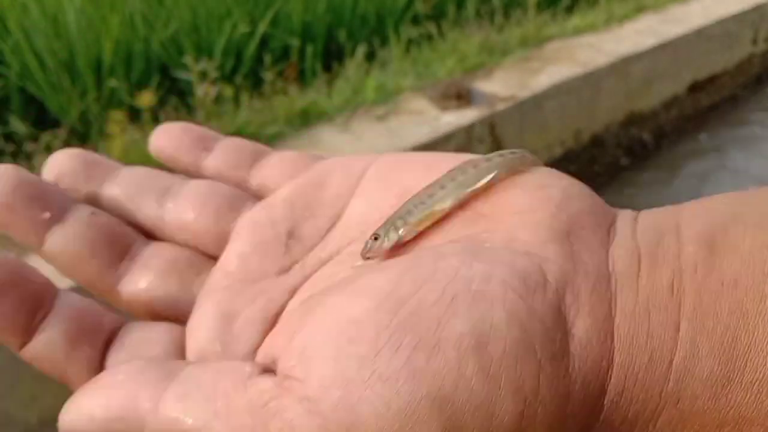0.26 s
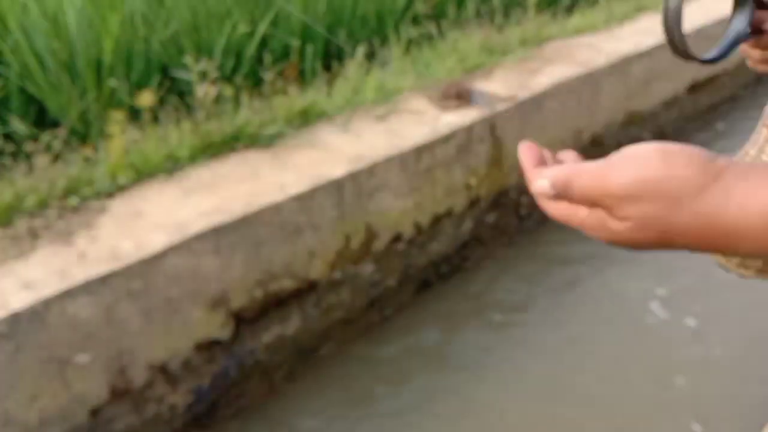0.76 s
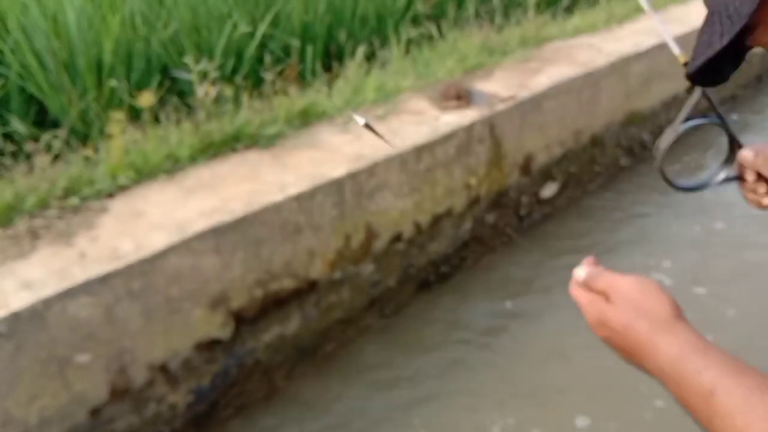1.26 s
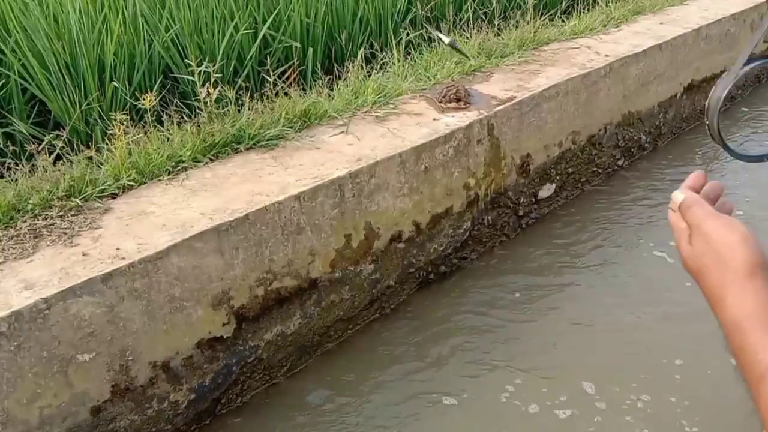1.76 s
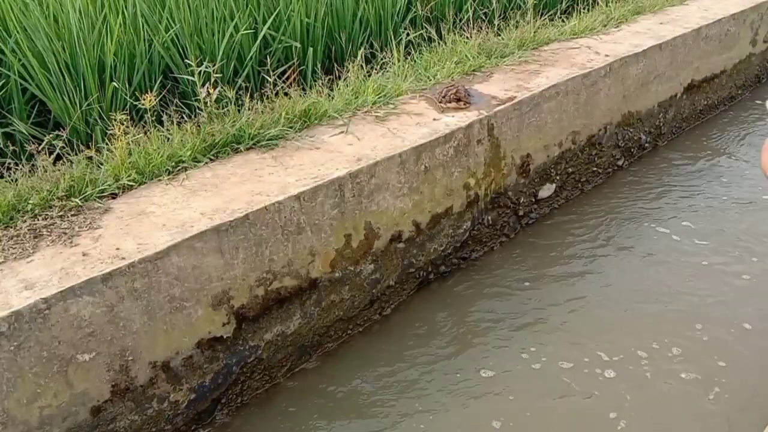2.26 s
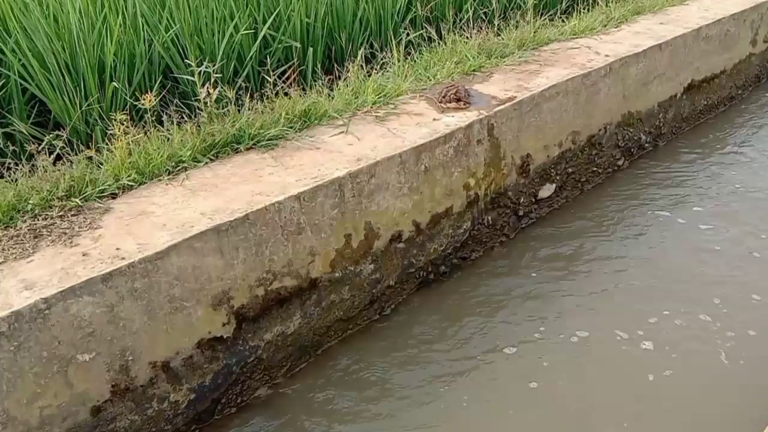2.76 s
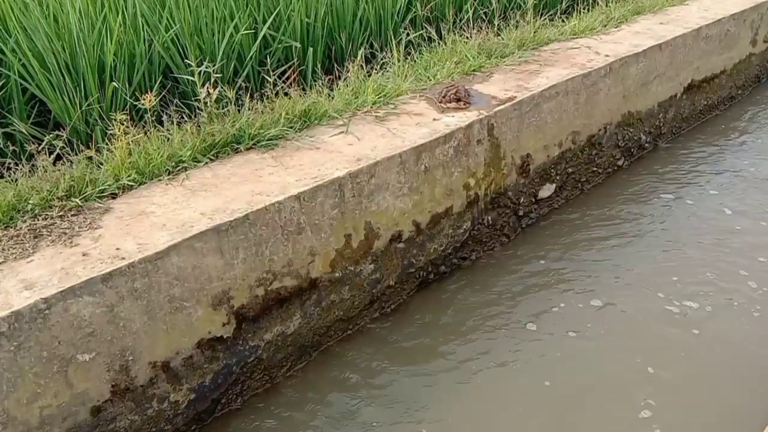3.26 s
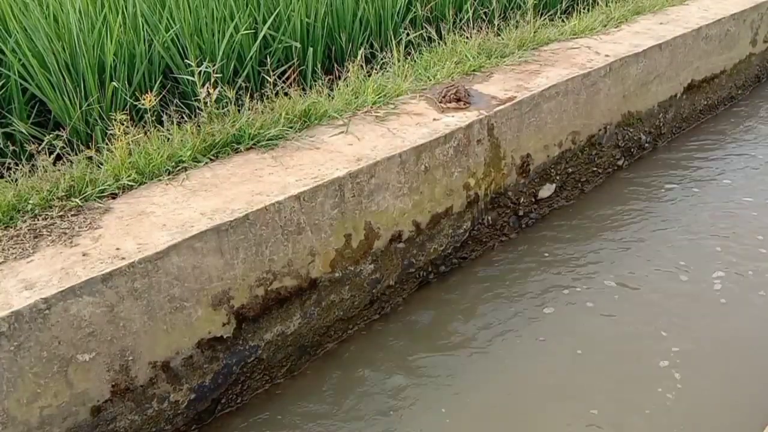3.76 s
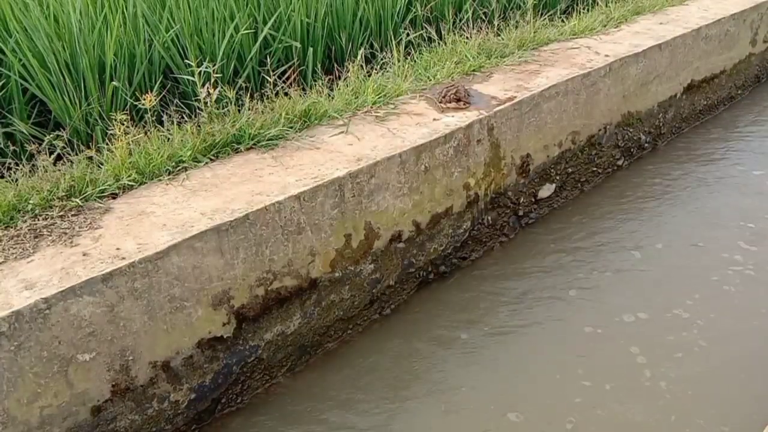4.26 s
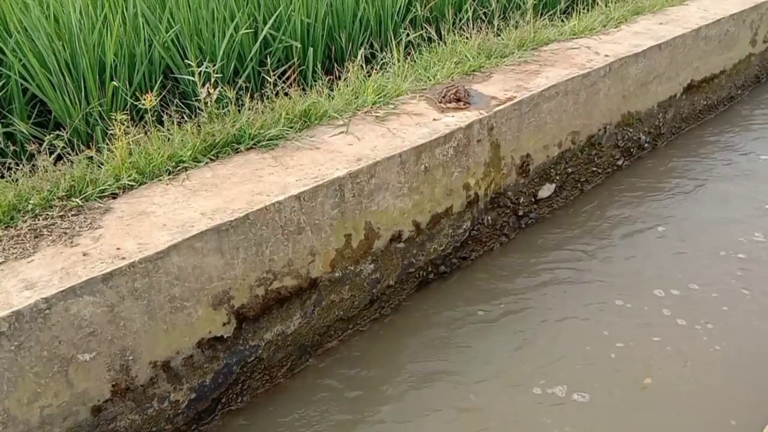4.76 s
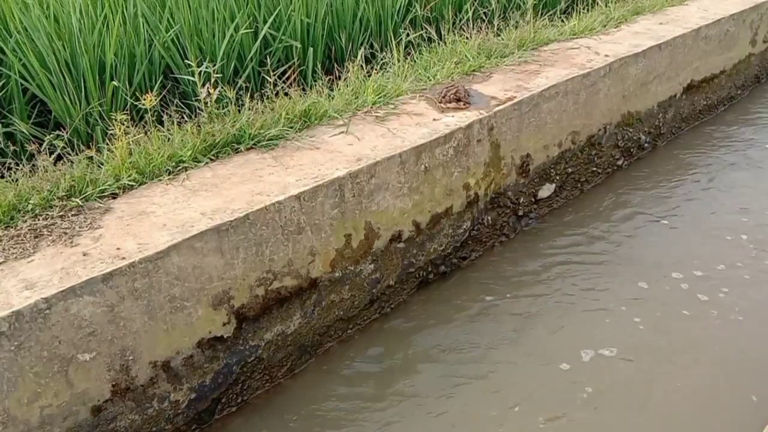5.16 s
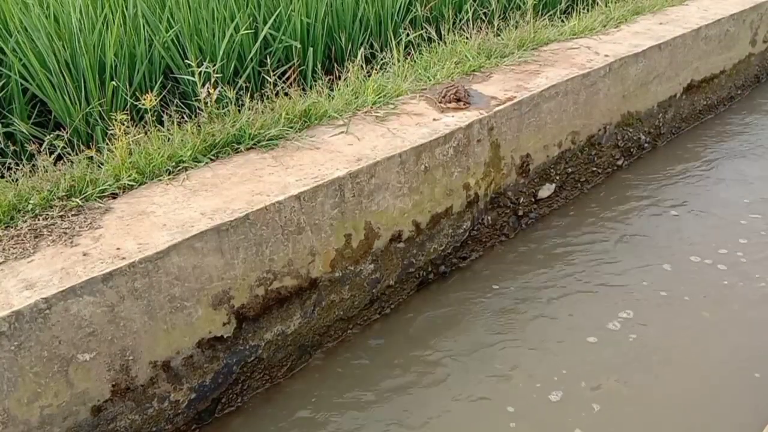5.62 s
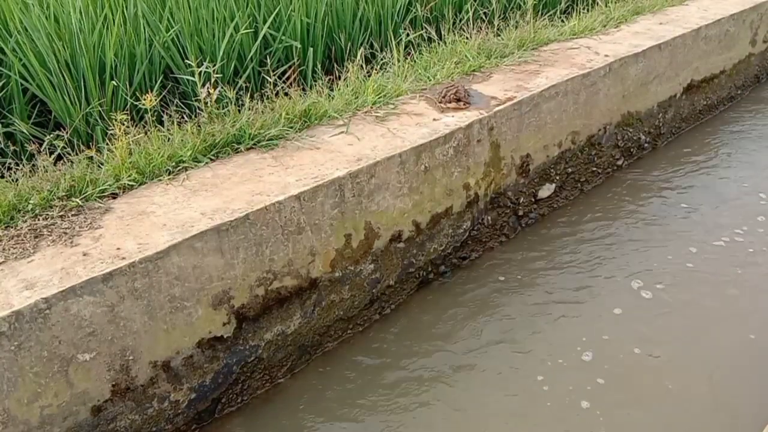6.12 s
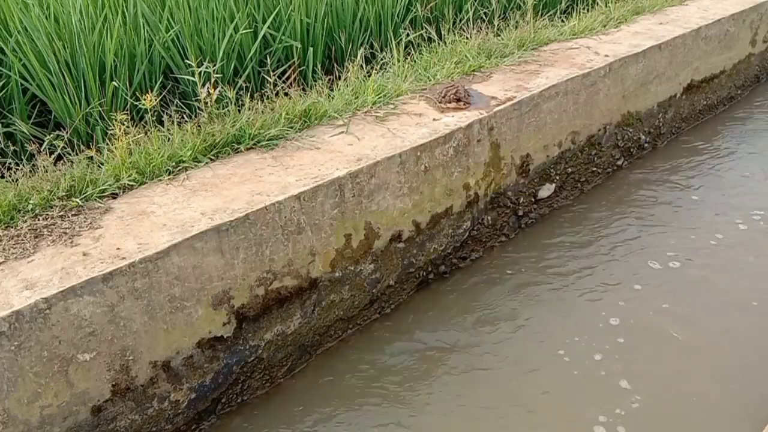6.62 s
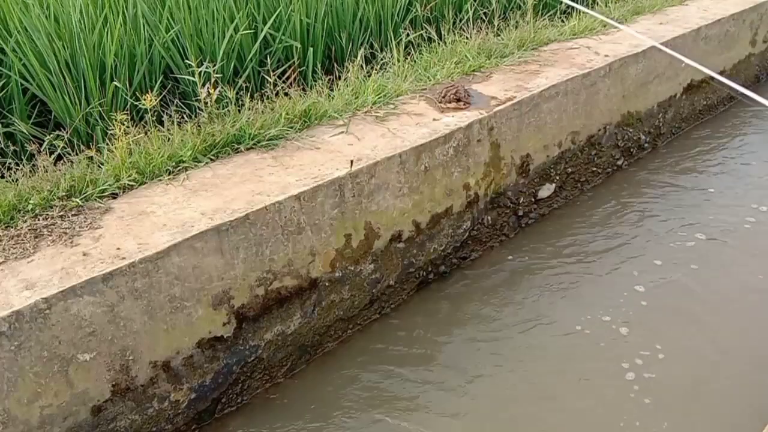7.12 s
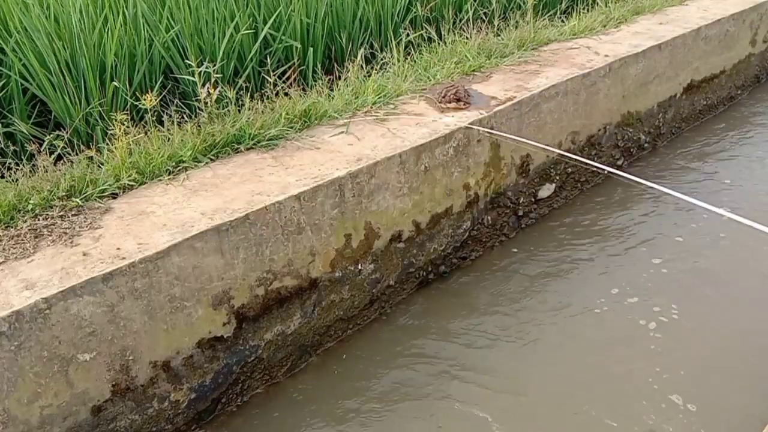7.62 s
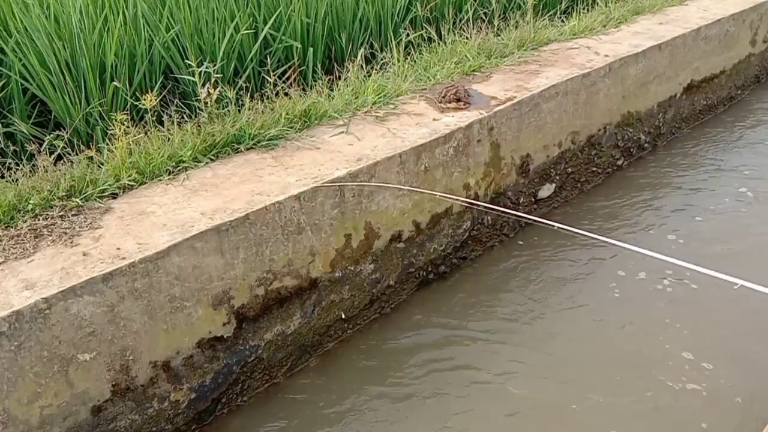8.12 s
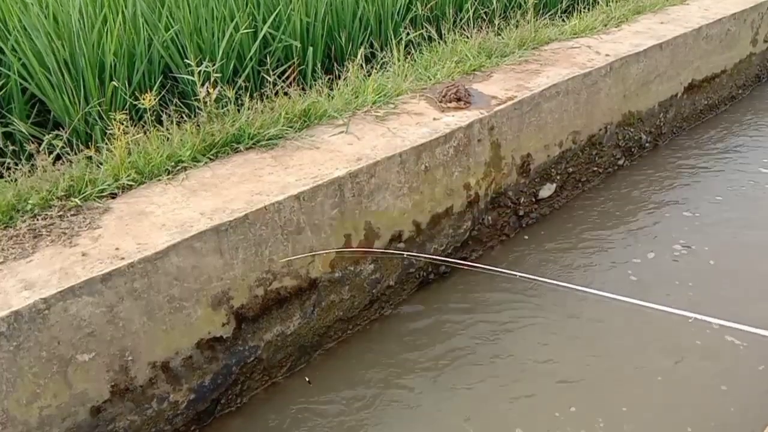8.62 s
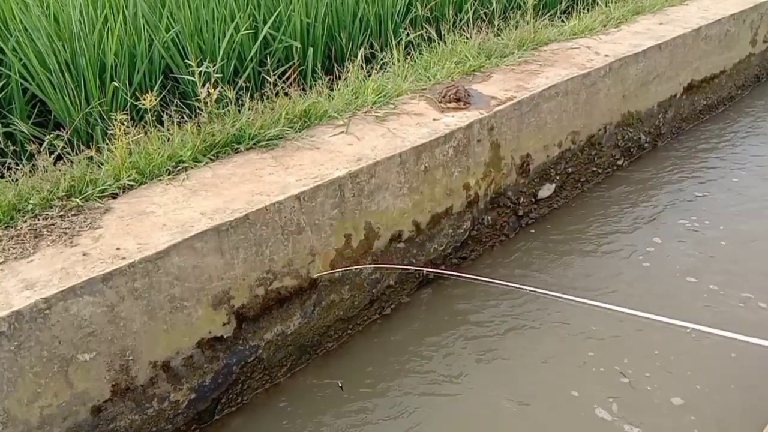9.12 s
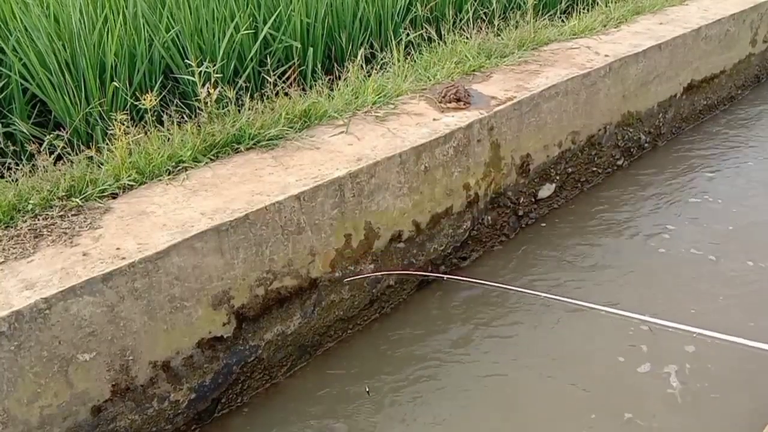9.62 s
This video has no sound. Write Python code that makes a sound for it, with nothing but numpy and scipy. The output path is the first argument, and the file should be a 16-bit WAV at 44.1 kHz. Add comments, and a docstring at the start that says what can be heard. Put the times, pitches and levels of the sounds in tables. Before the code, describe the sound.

From 0 to 4 seconds, water trickles quietly along a small concrete ditch in the open: a patchy wash of hiss, low gurgles and small rounded plops, thinning near 2 seconds and picking up again just before 3. A small bird gives very short, high, thin chips several times a second at most, continuing to the end. Lumpy light wind brushes the microphone, with dull bumps near 1.4 and 3 seconds; a distant pump drones almost inaudibly and fades. From about 4 seconds a slow engine emerges, rising fast by 5 to 6 into a low, nearly pure, wavering hum around 125 to 140 hertz, creeping upward in pitch over slight roar, and remaining the loudest sound. From 5.6 seconds the water is busier, with bright plops and slapping drops near 5.9, 7.3, 8.1 and 8.75, still splashing at about 9.9.

```python
"""Water trickles along a small concrete ditch: a patchy wash of bubbles, plops and snaps; a small bird chips nearby.
Bubbles are decaying sines of rising pitch, over bands of hiss and random bursts of spray; chips are quick sweeps.
A pump motor drones faintly far off, as four steady lines; then a slow engine draws near, and its low orders,
sines at multiples of the firing rate over a rough roar, become the loudest sound.
A light wind and a few bumps reach the microphone as shaped low noise and short low rings."""
import sys
import numpy as np
from scipy import signal
from scipy.fft import rfft, irfft
from scipy.io import wavfile
from scipy.ndimage import uniform_filter1d

SR = 44100
rng = np.random.default_rng(int(sys.argv[2]) if len(sys.argv) > 2 else 0)


def inscribe(sig):
    """Save sig as 16-bit PCM at rate SR to the path in sys.argv[1].

    A 1-D sig is mono; a 2-D sig holds one channel per row.
    Samples are clipped to [-1, 1] before scaling.
    """
    pcm = np.round(np.clip(np.atleast_2d(sig).T, -1, 1) * 32767)
    wavfile.write(sys.argv[1], SR, pcm.astype(np.int16))


N = 435708


def from_db(db):
    """Amplitude ratio of a level: 20 dB for each factor of ten."""
    return 10 ** (np.asarray(db) / 20)


def rms_one(x):
    """Normalise the mean power, so that the rms is 1."""
    return x / np.sqrt(np.mean(x ** 2) + 1e-20)


def in_time(rows):
    """Linear interpolation of a table's columns over time, one value per sample."""
    times, *columns = np.transpose(rows)
    return [np.interp(np.arange(N) / SR, times, column) for column in columns]


def at_hz(points, hz):
    """Linear interpolation of a spectrum's level along log frequency."""
    point_hz, point_db = np.transpose(points)
    return np.interp(np.log(hz), np.log(point_hz), point_db)


def drift(rate_hz):
    """Slow random variation of rms 1: white noise through two equal one-pole low-passes at rate_hz."""
    step = 40   # samples between coarse values
    pole = np.exp(-2 * np.pi * rate_hz * step / SR)
    white = rng.standard_normal(N // step + 2002)
    slow = signal.lfilter([1], [1, -2 * pole, pole * pole], white)[2000:]   # skip the filter's onset
    return np.interp(np.arange(N) / step, np.arange(len(slow)), rms_one(slow))


def coloured(spectrum):
    """Stationary noise of rms 1: white noise weighted by a spectrum, silent below half its first frequency."""
    hz = np.maximum(np.arange(N // 2 + 1) * SR / N, 1)
    gain = from_db(at_hz(spectrum, hz)) * (hz > spectrum[0][0] / 2)
    return rms_one(irfft(rfft(rng.standard_normal(N)) * gain, N))


def add(out, start_s, sound):
    """Superposition of a short sound at a given time."""
    i = round(start_s * SR)
    out[i:i + len(sound)] += sound[:N - i]


def swells(events, width_s):
    """Gaussian rises and dips in level [dB], summed; width_s is their standard deviation."""
    t = np.arange(0, N + 64, 64) / SR
    total_db = sum(db * np.exp(-.5 * ((t - s) / width_s) ** 2) for s, db in events)
    return np.interp(np.arange(N) / SR, t, total_db)


def wash(grain_db, patchy_db, crackle_db):
    """Random superposition: bands of hiss swell in separate patches; bubbles burst and spray crackles in them."""
    # spectrum of the water, shaping each size group from within: (frequency [Hz], relative density [dB per Hz])
    water_spectrum = [(150, -41), (250, -18.5), (336, -9), (444, -6.5), (566, -12.5), (709, -4), (829, -7),
                      (1240, -5), (1500, -7.5), (4400, -18), (5140, -27.5), (5600, -22.5), (6150, -28),
                      (6800, -21), (7660, -25), (9610, -29), (14600, -35.5), (15900, -24.5)]
    streak_share = 0.46   # below 5500 Hz the hiss fills this share of each band
    edges = np.r_[250 * 2 ** np.arange(0, 2.6, 1 / 8), np.arange(1600, 5500, 170),
                  np.arange(5500, 9000, 500), np.geomspace(9000, 16000, 5)]   # Hz
    # gurgle, lower wash, wash, splashing, fine and finest spray
    groups = np.digitize(edges, [750, 1150, 2500, 5500, 10000])
    parts = np.zeros((6, N))
    white = rng.standard_normal((3, N))
    drops = [crackle(per_s=55.0, fade_s=0.0079) for part in parts]   # each group has its own droplets
    clumps = rng.random(200)   # shared by bubbles of all sizes
    for k, (low, high, group) in enumerate(zip(edges, edges[1:], groups)):
        hz = np.sqrt(low * high)
        half = (high - low) / 2 * (streak_share if hz < 5500 else 1)
        band = signal.butter(2, [hz - half, hz + half], "band", fs=SR, output="sos")
        hiss = rms_one(signal.sosfilt(band, white[k % 3]))
        fine = np.clip(np.log2(hz / 3800) / 3.0, 0, 1)   # share of spray against bubbles
        patch_db = (2.0 - fine) * patchy_db * (drift(5.3) + 0.75 * drift(1.72))
        bubbles = burble(low, high, hiss, clumps, cycles=71.5, tail_s=0.011, tail_db=-3.5)
        grains = (1 - fine) * from_db(grain_db) * bubbles
        spray = fine * from_db(crackle_db) * drops[group] * hiss
        band_gain = from_db(at_hz(water_spectrum, hz)) * np.sqrt(high - low)
        parts[group] += band_gain * (from_db(patch_db) * hiss + grains + spray)
    levels_db = size_levels(surge_db=0.47)
    return sum(from_db(db) * rms_one(part) for db, part in zip(levels_db, parts))


def size_levels(surge_db):
    """Additive level modulation [dB] of each size of bubble and drop: flow, surges, gurgles and splashes."""
    # the flow: (time [s], wash before offset [dB], finest spray before offset [dB], low gurgle before swells [dB])
    flow = [(0.0, -38.5, -73.5, -59), (0.27, -40, -74, -51.5), (0.49, -47, -70.5, -57.5),
            (0.79, -40, -72, -60), (1.35, -42.5, -79.5, -61), (1.51, -43, -76.5, -62),
            (1.7, -47, -80.5, -66.5), (2.26, -55, -80, -70.5), (2.72, -38.5, -71.5, -55),
            (3.0, -43.5, -69, -60.5), (3.58, -46, -80.5, -63), (4.62, -43.5, -85, -58.5),
            (4.95, -43.5, -78.5, -51), (5.45, -41, -82, -61), (5.94, -32.5, -75.5, -54.5),
            (7.04, -37.5, -80, -59), (7.9, -35.5, -71, -52), (8.42, -40.5, -74, -55.5),
            (8.81, -28.5, -74.5, -56.5), (9.05, -35.5, -75, -40), (9.27, -37, -75.5, -52.5),
            (9.88, -37.5, -76.5, -53.5)]
    # lower wash, 750-1150 Hz: (time [s], level before offset and swells [dB])
    low_wash = [(0.0, -52), (0.19, -49), (0.52, -55), (0.82, -54), (1.35, -50.5), (1.51, -62), (2.31, -63),
                (2.56, -51), (2.83, -47.5), (3.63, -63), (3.88, -61.5), (4.1, -50), (4.73, -54.5),
                (4.98, -49), (5.47, -50), (5.72, -48.5), (5.86, -43), (6.24, -43.5), (6.35, -41.5),
                (6.85, -46), (7.1, -47.5), (7.51, -41), (8.53, -49), (8.89, -43.5), (9.38, -49.5),
                (9.88, -48.5)]
    # splashing, 2500-5500 Hz: (time [s], level before offset and swells [dB])
    splashing = [(0.0, -54), (0.36, -52), (1.38, -55), (1.9, -65), (2.28, -65), (2.75, -53), (3.19, -52.5),
                 (3.58, -61.5), (4.79, -55), (4.92, -54), (5.61, -55.5), (5.86, -49), (6.41, -48),
                 (6.74, -52.5), (6.99, -51), (7.1, -51), (7.73, -47.5), (8.15, -53.5), (8.78, -43),
                 (8.92, -44), (9.27, -49), (9.88, -52)]
    # wash, fine and finest spray: (offset [dB], share of the wash's level; the rest follows the spray's)
    sizes = [(-0.5, 0.91), (4.5, 0.43), (8.5, 0.0083)]
    # low gurgles well up and sink again: (time [s], swell [dB])
    gurgles = [(.41, 8), (1.43, 10), (3.63, 9), (4.13, 10), (4.81, 6.5), (5.72, 16), (6.85, 6.5),
               (7.38, 18.5), (7.81, 7.5), (8.5, 6), (9.0, 2.5), (9.52, 13)]
    # splashes throw up spray for a moment: (time [s], swell before shares [dB])
    splashes = [(2.94, 5), (3.36, 6), (3.99, 11.5), (5.87, 11.5), (6.44, 6), (6.96, 8), (7.32, 7), (8.1, 2),
                (9.05, 7), (9.69, 11), (9.87, 11)]
    # share of that swell, one each for wash, splashing, fine and finest spray: (share)
    splash_shares = [0.37, 0.9, 0.79, 1.0]
    # the flow surges or slackens for about a tenth of a second: (time [s], swell before shares [dB])
    surges = [(.87, 7.5), (1.14, 1), (1.3, 7.5), (1.45, 6), (1.54, 2.5), (2.78, 5.5), (2.95, 1),
              (3.36, 3.5), (3.65, 7.5), (3.92, 8.5), (1.62, -4.5), (4.07, -6), (5.12, 5), (5.72, 10),
              (5.84, 7), (6.03, -2.5), (8.68, 7), (8.83, 1), (8.95, 5), (9.19, 6.5), (9.53, 10)]
    # share of that swell, one each for lower wash, wash, splashing, fine and finest spray: (share)
    surge_shares = [0.91, 0.64, 0.65, .3, .1]

    wash_db, spray_db, gurgle_db = in_time(flow)
    splash_db = swells(splashes, width_s=0.014)
    flush_db = swells(surges, width_s=0.031)
    levels = [offset + share * wash_db + (1 - share) * spray_db for offset, share in sizes]
    levels.insert(1, in_time(splashing)[0] + 2.0)
    levels = [db + share * splash_db + surge_db * drift(1.4) for db, share in zip(levels, splash_shares)]
    levels.insert(0, in_time(low_wash)[0] + 2.7)
    levels = [db + share * flush_db for db, share in zip(levels, surge_shares)]
    return [gurgle_db + swells(gurgles, width_s=0.064)] + levels


def burble(low, high, hiss, clumps, cycles, tail_s, tail_db):
    """Clustered random arrivals: bubbles of one size, each trailing a streak of hiss that dies away; rms 1."""
    clump_s = .02
    draws = rng.random((180, 4))   # time, pitch, size and climb of each bubble
    # half of them join a clump
    draws[::2, 0] = (rng.choice(clumps, 90) + clump_s * SR / N * draws[::2, 0]) % 1
    pops, starts = np.zeros(N), np.zeros(N)
    for when, pitch, size, climb in draws:
        hz = low * (high / low) ** pitch
        gain = from_db(-3.0 * np.log(size + 0.037))   # a few are much louder
        add(pops, when * N / SR, gain * bubble(hz, cycles / hz, 0.06 * climb, 4.4 / hz))
        starts[int(when * N)] += gain
    fade = np.exp(-1 / (tail_s * SR))
    streaks = signal.lfilter([1 - fade], [1, -2 * fade, fade ** 2], starts) * hiss
    return rms_one(rms_one(pops) + from_db(tail_db) * rms_one(streaks))


def bubble(hz, t60, rise, attack_s):
    """Damped resonance of an air pocket whose pitch climbs as it nears the surface; envelope peak 1."""
    t = np.arange(round((t60 + attack_s) * SR)) / SR
    decay = from_db(-60 * (t / t60) ** 1.7)   # dies faster and faster as the bubble bursts
    shape = (1 - np.exp(-t / attack_s)) ** 2 * decay
    return shape / shape.max() * np.sin(2 * np.pi * hz * (t + rise * t * t / t60))


def crackle(per_s, fade_s):
    """Random impulse train for the spray's envelope: droplets land by chance, each a soft brief burst; rms 1."""
    drops = (rng.random(N) < per_s / SR) * rng.exponential(1, N) ** 1.84
    span = round(fade_s * SR)
    return rms_one(uniform_filter1d(uniform_filter1d(drops, span), span))


def plops():
    """Damped resonance of bubbles large enough to stand out singly; longer rings swell more slowly."""
    # single bubbles: (time near peak [s], peak before echoes [dB], starting pitch [Hz], ring [cycles to about -32 dB])
    single_bubbles = [(1.403, -37.5, 265, 8.5), (7.4, -37.5, 440, 22), (7.33, -39, 398, 11),
                      (0.439, -39, 485, 15), (1.015, -45, 505, 28), (0.86, -48, 580, 26),
                      (1.32, -42.5, 593, 27), (1.49, -44.5, 540, 20), (3.868, -37, 1270, 20),
                      (0.72, -39, 994, 40), (1.419, -34, 410, 7.3), (3.615, -38, 365, 21),
                      (3.972, -36.5, 368, 6.5), (4.012, -44, 293, 11), (8.949, -27, 292, 7.7),
                      (0.199, -38.5, 520, 11), (0.045, -36, 900, 23), (0.085, -42, 915, 35),
                      (0.29, -38, 374, 21), (0.345, -36.5, 808, 23), (0.395, -34, 430, 20),
                      (0.85, -40, 866, 16), (1.014, -37.5, 970, 19), (1.125, -35.5, 824, 28),
                      (1.438, -34, 973, 27), (2.632, -36.5, 1360, 37), (2.809, -42, 430, 12),
                      (2.94, -31, 975, 29), (2.965, -30.5, 1566, 20), (3.33, -37.5, 825, 12),
                      (3.385, -30, 1594, 27), (3.39, -29.5, 2120, 20), (3.94, -36, 697, 46),
                      (6.135, -36, 416, 6.4), (6.336, -40, 410, 11), (0.916, -37.5, 780, 14),
                      (2.485, -37.5, 647, 8.1), (2.622, -31.5, 658, 19), (5.425, -43.5, 513, 29),
                      (5.504, -33.5, 650, 10), (5.645, -18, 750, 18), (5.716, -28.5, 447, 18),
                      (6.017, -37, 635, 21), (6.256, -40, 627, 16), (6.391, -31.5, 706, 23),
                      (6.79, -30.5, 770, 12), (6.962, -35.5, 712, 21), (7.213, -37.5, 710, 20),
                      (7.325, -24.5, 806, 18), (7.373, -30, 699, 24), (7.634, -36, 704, 54),
                      (8.463, -38, 584, 15), (8.513, -25, 743, 7.8), (8.634, -30.5, 681, 13),
                      (8.765, -24.5, 726, 18), (9.17, -33, 776, 37), (2.008, -33.5, 1550, 25),
                      (2.287, -37, 1167, 23), (2.768, -24, 950, 17), (3.708, -33.5, 1470, 16),
                      (4.781, -25.5, 914, 12), (4.833, -32, 1060, 9.3), (5.204, -34.5, 1105, 16),
                      (5.512, -23.5, 1330, 26), (5.775, -23, 1880, 22), (5.92, -39, 1540, 14),
                      (6.024, -22.5, 930, 15), (6.217, -29, 1050, 16), (6.292, -24.5, 1280, 12),
                      (6.574, -32.5, 1680, 21), (6.652, -19.5, 1830, 14), (6.902, -25.5, 1130, 7.8),
                      (7.167, -26.5, 1050, 15), (7.315, -15, 2000, 5), (7.338, -26, 1700, 16),
                      (7.596, -35, 1720, 14), (7.65, -20, 1054, 15), (7.763, -32, 1760, 16),
                      (7.991, -15.5, 1123, 8.6), (8.214, -25, 1345, 19), (8.243, -20.5, 1226, 10.5),
                      (8.375, -24, 974, 23), (8.447, -22, 1286, 24), (8.627, -27, 1295, 14),
                      (8.685, -26.5, 1550, 14), (8.714, -28.5, 1260, 20), (8.751, -10.5, 1250, 9.7),
                      (8.806, -24, 1250, 19), (8.839, -24.5, 1250, 12), (8.944, -16.5, 976, 8.7),
                      (9.317, -32, 1350, 44), (9.504, -17, 1570, 8.2), (9.528, -20.5, 1190, 10),
                      (9.835, -31.5, 1200, 26), (0.254, -28, 4170, 15), (0.528, -36, 2480, 25),
                      (0.5953, -40, 2460, 22), (1.045, -33, 2850, 14), (1.609, -33.5, 3330, 25),
                      (3.2764, -29, 2970, 8.8), (3.6416, -35, 2240, 31), (3.9313, -34.5, 2310, 23),
                      (5.655, -32, 2330, 23), (5.7314, -27.5, 2390, 14), (5.843, -32, 2020, 20),
                      (6.0308, -21, 1960, 19), (6.0771, -22, 1980, 18), (6.6508, -25.5, 2000, 13),
                      (6.7155, -23, 4290, 25), (7.222, -18.5, 2020, 12), (7.314, -13, 3490, 7.5),
                      (7.375, -18.5, 2070, 6.9), (7.705, -24, 3550, 10), (7.7616, -20.5, 2630, 9.5),
                      (8.1066, -15, 4220, 5.1), (8.1685, -22.5, 2330, 19), (8.213, -25.5, 2230, 17),
                      (8.375, -26, 4210, 22), (8.4587, -23.5, 2300, 18), (8.556, -26, 2100, 15),
                      (8.8039, -36, 2290, 12), (9.0573, -15.5, 2130, 7.5)]
    out = np.zeros(N)
    for s, peak_db, hz, cycles in single_bubbles:
        t60 = max(cycles, 3) * 1.44 / hz
        ring = bubble(hz, t60, rise=0.026, attack_s=0.18 * cycles / hz + 0.00099)
        add(out, s - 1.448 / hz - .001, from_db(peak_db) * ring)   # start ahead of the peak
    return out


def snaps(fade_s):
    """Broadband impact of a drop slapping the surface: a brief decaying burst of bright noise."""
    # sharp splashes: (start [s], peak [dB])
    slaps = [(5.862, -32), (5.877, -27.5), (7.319, -21), (8.1055, -38.5), (8.123, -30.5), (8.376, -25.5),
             (9.044, -25)]
    out = np.zeros(N)
    t = np.arange(round(0.028 * SR)) / SR
    band = signal.butter(2, [2300, 7000], "band", fs=SR, output="sos")
    for (s, peak_db), noise in zip(slaps, rng.standard_normal((len(slaps), len(t)))):
        burst = signal.sosfilt(band, noise * np.exp(-t / fade_s))
        add(out, s, from_db(peak_db) * burst / np.abs(burst).max())
    return out


def ditch(x, wet_db):
    """Reverberation: the concrete channel smears each sound into a short, exponentially decaying tail."""
    t60 = 0.28   # s
    t = np.arange(round(t60 * SR)) / SR
    tail = rng.standard_normal(len(t)) * from_db(-60 * t / t60)
    return x + from_db(wet_db) * signal.fftconvolve(x, tail / np.linalg.norm(tail))[:N]


def wall(x):
    """Comb interference: a dull, slightly late echo stripes the spectrum; the stripes slide with the path."""
    # echo off the near wall as the listener shifts: (time [s], delay before a one-sample advance [s], share)
    echo_path = [(0, 0.0012, 0.4), (1.2, 0.0011, 0.44), (2.2, 0.0017, 0.14), (3.8, 0.0014, 0.31),
                 (4.5, 0.0018, 0.76), (5.2, 0.0019, 0.66), (6, 0.00177, 0.78), (7, 0.0017, 1),
                 (8, 0.0015, 0.21), (9.88, 0.0013, 0.055)]
    lag_s, share = in_time(echo_path)
    late = np.interp(np.arange(N) - lag_s * SR, np.arange(N), x)
    dull = signal.butter(1, 1470, fs=SR, output="sos")   # low-pass, Hz
    return x + share * signal.sosfilt(dull, np.roll(late, -1))   # one sample earlier


def engine(waver_db, wander, slip, roar_db, fading_db, uneven_db):
    """Harmonic orders of the firing rate slip in phase and throb; air fades and wavers them, over exhaust roar."""
    # the engine gradually speeds up: (time [s], firing rate [1/s])
    speed = [(3.8, 30.8), (4.9, 31.5), (5.8, 32.05), (6.7, 32.75), (7.6, 33.6), (8.5, 34.3), (9.88, 35.35)]
    # the 4th order as the engine nears: (time [s], level before fading and wavering [dB rms])
    approach = [(3.8, -80), (4.22, -51), (4.87, -35), (5.5, -34), (5.65, -26), (6.05, -29), (6.15, -24.5),
                (6.5, -27), (6.9, -23.5), (7.05, -29), (7.28, -27.5), (7.38, -23), (7.48, -30.5),
                (7.6, -26.5), (8.5, -28.5), (9.05, -26), (9.6, -29.5), (9.88, -29)]
    # side orders: (multiple, level when the 4th is at near_db [dB], dB of change per dB of the 4th)
    side_orders = [(3, -34.5, 1.25), (5, -33, 1.06)]
    # weak orders: (multiple, level relative to the 4th before fading [dB])
    weak_orders = [(1, -48), (2, -30), (3.5, -20), (4.5, -16), (6, -25), (7, -30), (8, -36)]
    # exhaust roar: (frequency [Hz], relative density [dB per Hz])
    exhaust = [(60, -11), (95, 13.5), (140, 13.5), (180, -4), (230, -1.5), (300, -70)]
    near_db = -25

    turn = 2 * np.pi * np.cumsum(in_time(speed)[0]) / SR
    loud_db = in_time(approach)[0]
    loud = from_db(loud_db)
    orders = [(4, loud * from_db(fading_db / 2 * drift(4)))]
    for k, db, steep in side_orders:
        orders.append((k, from_db(db + steep * (loud_db - near_db) + fading_db * drift(4.05))))
    for k, db in weak_orders:
        orders.append((k, loud * from_db(db + fading_db * drift(4.6))))
    tones = np.zeros(N)
    for k, gain in orders:
        phase = k * turn + wander * drift(28) + slip * drift(1.4)   # rad
        tones += gain * from_db(waver_db * drift(18.0)) * np.sin(phase)
    throbbing = np.sqrt(2) * tones * from_db(uneven_db * drift(19.0))
    roar = loud * from_db(roar_db) * coloured(exhaust)
    fade_in = np.clip((np.arange(N) / SR - approach[0][0]) / 0.37, 0, 1)
    return fade_in * (throbbing + roar)


def ticks():
    """Frequency modulation: a small bird chips repeatedly, each chip a quick arch at a slightly different pitch."""
    # bird chips: (start [s], reference peak before variation and echo [dB])
    calls = [(0.179, -38.5), (0.5876, -34), (0.783, -32.5), (0.9656, -40), (1.132, -42), (1.2082, -38.5),
             (1.417, -38), (1.725, -48.5), (2.177, -40), (2.858, -33.5), (3.039, -40), (3.548, -37.5),
             (3.9639, -49.5), (4.114, -35), (4.313, -40), (4.806, -43), (4.9132, -51), (4.995, -46),
             (5.101, -40.5), (5.5117, -40.5), (5.689, -37.5), (5.756, -39), (5.916, -40), (6.142, -35.5),
             (6.3405, -36.5), (6.4167, -34), (6.861, -32), (7.0516, -39), (7.2983, -45), (7.5517, -36.5),
             (7.661, -42), (7.753, -35.5), (8.1705, -37.5), (8.3573, -33), (8.474, -41), (8.6043, -46),
             (8.8558, -34.5), (8.937, -35.5), (9.046, -36.5), (9.318, -42), (9.4825, -44.5), (9.6761, -43)]
    # one chip, an arch in pitch: (time from start [s], mean pitch [Hz], level re reference peak [dB])
    chip = [(0, 6900, -25), (.001, 7600, -2), (.003, 7800, 0), (.005, 8100, -4), (.0062, 8700, -15),
            (.011, 9300, -14), (.015, 8600, -15), (.0165, 7000, -7), (.018, 5700, -25)]
    out = np.zeros(N)
    chip_s, hz, db = np.transpose(chip)
    t = np.arange(round(chip_s[-1] * SR)) / SR
    turn = 2 * np.pi * np.cumsum(np.interp(t, chip_s, hz)) / SR
    for (s, peak_db), (off, late) in zip(calls, rng.normal(0, 1, (len(calls), 2))):
        level_db = peak_db + np.interp(t, chip_s, db)
        level_db += 6.7 * late * (t > chip_s[5])   # the falling end varies in level
        add(out, s, from_db(level_db) * np.sin(turn * (1 + 0.0099 * off)))
    return ditch(out, wet_db=-10.0)


def pump():
    """Line spectrum of a far motor: steady pitches waver a little while the level sinks by 1.5 dB a second."""
    # far motor: (frequency [Hz], mean level at the start [dB rms])
    lines = [(154, -61), (193, -71), (231.5, -72), (270, -77)]
    t = np.arange(N) / SR
    hum = np.zeros(N)
    for hz, db in lines:
        gain = np.sqrt(2) * from_db(db + 0.58 * drift(2.1))
        hum += gain * np.sin(2 * np.pi * hz * t + .5 * drift(1.4))
    return hum * from_db(-1.5 * t)


def microphone_wind():
    """Turbulent pressure noise: air over the port gives lumpy low noise; dull bumps of the hand ring briefly."""
    # lull between gusts: (time [s], level before swells and drift [dB])
    lull = [(0, -62.5), (1.4, -56.5), (1.7, -63.5), (2.6, -66), (3.6, -69)]
    # gusts: (time [s], swell [dB])
    gust_swells = [(.04, 11.5), (.33, 13), (.5, 8), (.83, 11), (.97, 12.5), (1.18, 7.5), (1.46, 9),
                   (1.83, 12.5), (2.14, 6), (2.32, 9), (2.74, 7), (3.1, 8), (3.38, 9)]
    # deep buffeting: (time [s], level before drift [dB])
    rumble = [(0.0, -80), (2.72, -85), (3.11, -51), (3.24, -73), (3.41, -55), (3.63, -94), (5.31, -63),
              (6.05, -67), (6.11, -53), (7.98, -59), (8.09, -43), (8.45, -75), (9.71, -70), (9.88, -80)]
    # bumps: (start [s], peak [dB], pitch [Hz], decay by 60 dB [s])
    bumps = [(1.428, -34.5, 148, 0.16), (2.979, -45.5, 79, 0.16), (3.077, -29, 82, 0.041),
             (3.374, -46, 92, 0.12)]
    # spectra: (frequency [Hz], relative density [dB per Hz])
    gust_noise = coloured([(25, -53.5), (50, -14.0), (90, 9.0), (150, 14.5), (220, -7), (400, -20)])
    deep_noise = coloured([(15, -0.5), (30, 8.5), (55, 25.0), (90, -43.5)])

    gust_db = in_time(lull)[0] + swells(gust_swells, width_s=0.046) + 2.8 * drift(7.0)
    deep_db = in_time(rumble)[0] + 1.2 * drift(24)
    out = from_db(gust_db) * gust_noise + from_db(deep_db) * deep_noise
    for s, peak_db, hz, t60 in bumps:
        add(out, s, from_db(peak_db) * bubble(hz, t60, rise=0, attack_s=0.0017))
    return out


def scene():
    """Linear superposition of water, bird, motors and wind, heard in the open."""
    water = wash(grain_db=11.0, patchy_db=2.5, crackle_db=15.0)
    water = water + ditch(plops(), wet_db=-7.0)
    motors = engine(waver_db=1.2, wander=.12, slip=.35, roar_db=-22, fading_db=3.0, uneven_db=1.3) + pump()
    return (wall(water) + snaps(fade_s=0.0059) + ticks() + motors + microphone_wind())[None]


def record(dry):
    """Linear filtering by the microphone: a dull stretch in the treble, then a steep cut."""
    dip = signal.butter(6, (8796, 11960), "bandstop", fs=SR, output="sos")
    rest = signal.sosfiltfilt(dip, dry)
    heard = rest + from_db(-13) * (dry - rest)   # the stretch itself, 13 dB down
    return signal.sosfilt(signal.ellip(12, .2, 75, 15450, fs=SR, output="sos"), heard)


dry = scene()
out = record(dry)
inscribe(out)
```